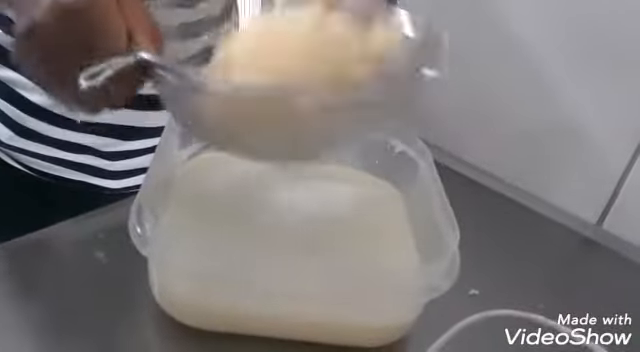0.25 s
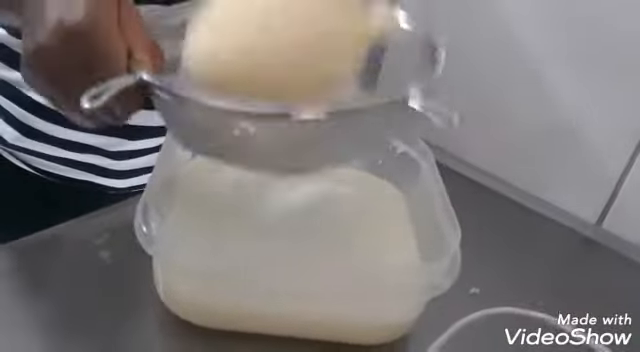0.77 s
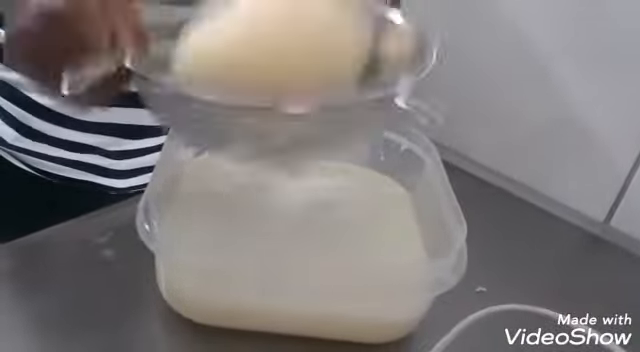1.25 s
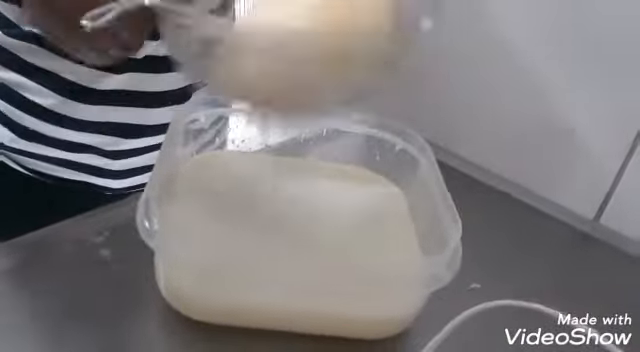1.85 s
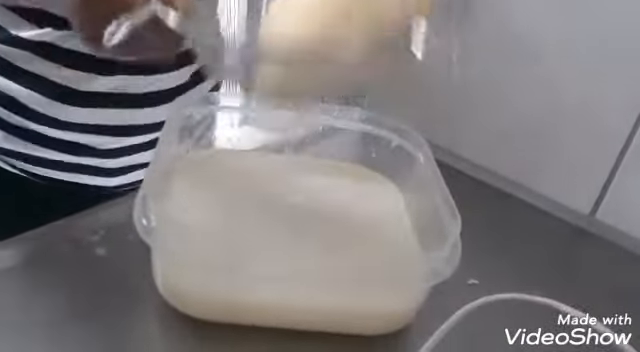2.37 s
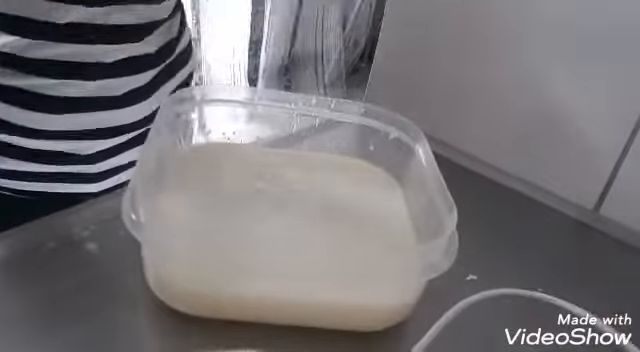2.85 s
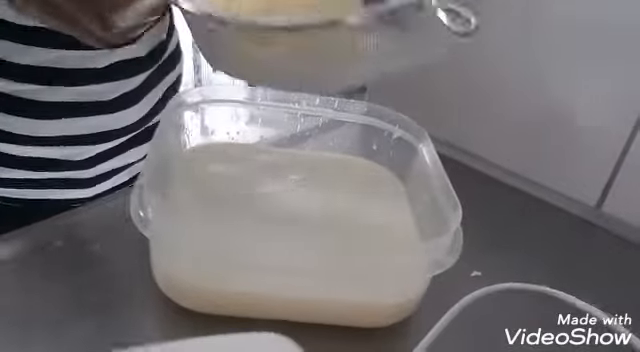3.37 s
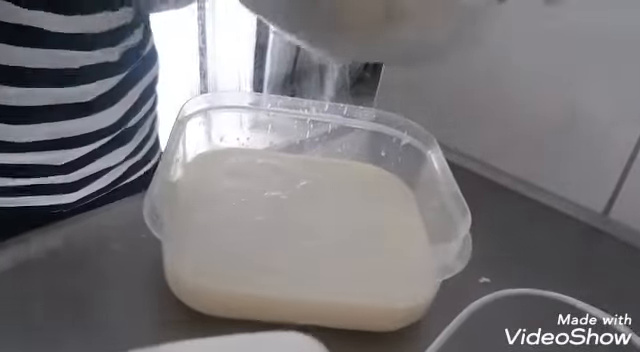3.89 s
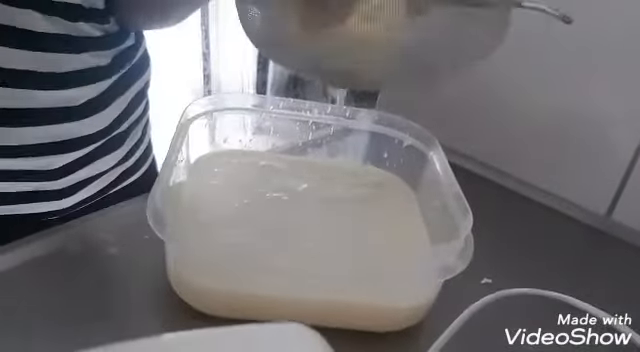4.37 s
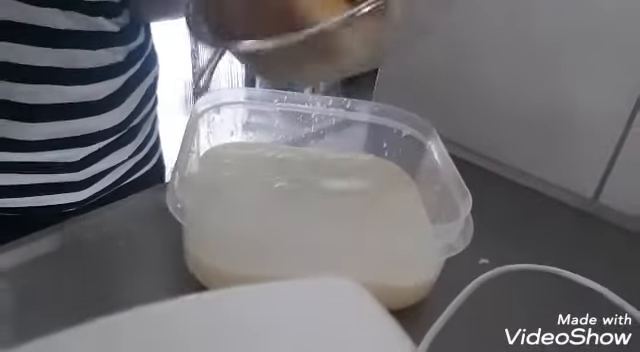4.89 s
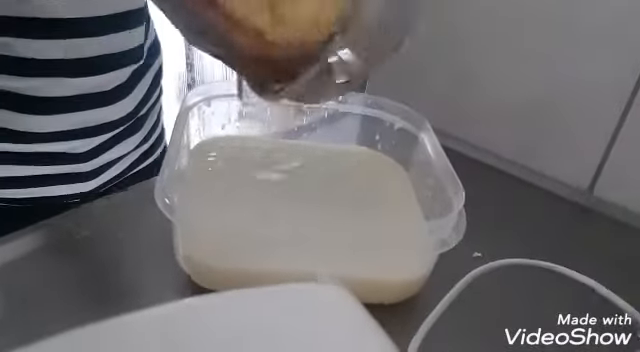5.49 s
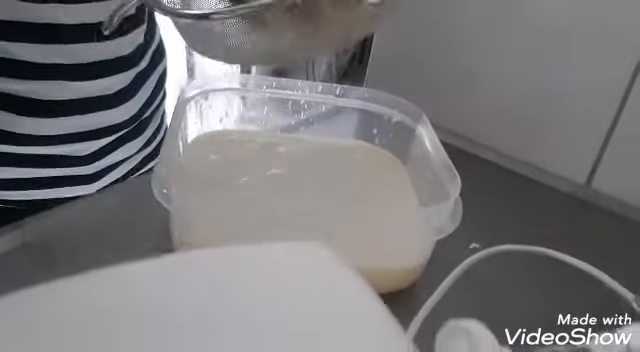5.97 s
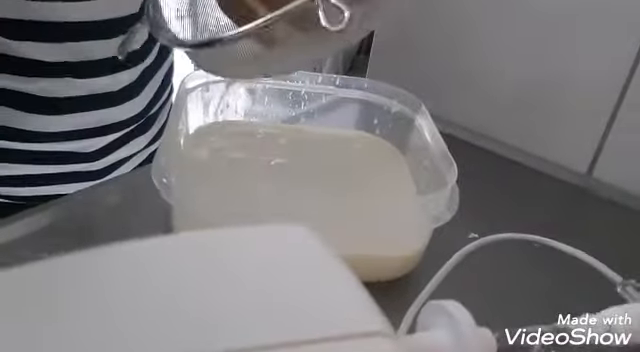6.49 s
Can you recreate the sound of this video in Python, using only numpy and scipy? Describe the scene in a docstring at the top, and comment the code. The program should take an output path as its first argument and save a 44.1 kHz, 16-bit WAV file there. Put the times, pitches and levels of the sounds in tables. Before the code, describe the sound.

A small tiled kitchen, heard close in stereo with a short, lively room ring and very quiet air. From 0 to 2 seconds, a wet butter lump is tossed and rolled in a wire sieve: short gritty swishes, soft low thuds, wet splats, and light knocks near 0.3, 0.85 and 1.1. Around 1.4-1.85 a squelchy gush gurgles into the plastic tub, rising in pitch over low glugs. It calms after 2; a firmer knock lands at 2.7, then clustered plinks and a bright metal click at 2.9. At 3.25 one hard, sharp knock cracks, clatters and rings briefly, easily the loudest event. From 3.5 tiny high clicks and drops resume, with dull sieve bumps near 4. From 4.4 to 5 drops patter busily, with a ringing tick on the tub at 4.63. Sparse bubbly plinks and trickles follow, thickening again from 6.2 to the end.

```python
"""Wet butter swishes over a mesh with soft thuds, liquid splats and plinks below, and hard knocks ring the room.
The lump is rolled about in a wire sieve over a plastic tub in a small tiled kitchen, close to a phone's two
microphones. Shaped noise makes the swish, thuds, splats and air; pitched decaying tones make the bubbles, a
bright metal click and a tick on the tub. The knocks are noise bursts with ringing modes: a few light ones,
then a sharp one. Decaying noise echoes the sieve, splats, knocks and plinks around the room."""
import sys
import numpy as np
from scipy import signal
from scipy.fft import rfft, irfft, next_fast_len
from scipy.io import wavfile

SR = 44100
rng = np.random.default_rng(int(sys.argv[2]) if len(sys.argv) > 2 else 0)


def waveform_to_disk(signal):
    """Save audio, clipped to [-1, 1], as 16-bit WAV at the path in sys.argv[1]."""
    frames = np.transpose(np.atleast_2d(signal))
    scaled = np.clip(frames, -1, 1) * 32767
    samples = np.round(scaled).astype(np.int16)
    wavfile.write(sys.argv[1], SR, samples)


N = 297189
TIME = np.arange(N) / SR
AIR_DB = -72
LOW_HZ, TOP_HZ = 36, 15300  # limits of the phone's microphones
DRAIN_START_S = 2.2  # fine droplets and faint stray drops fall only after this

# Levels in the tables are relative; each source's own settings set the final balance.
# quiet air of the kitchen: (frequency [Hz], density [dB per Hz])
AIR_SPECTRUM = [(20, -27), (50, 8.5), (110, -10), (200, -9.5), (400, -29), (800, -31), (1400, -21),
                (1700, -15), (1950, -4), (2250, -15), (2600, -15.5), (3300, -6.5), (4500, -9.5),
                (8000, -25), (15000, -36)]
# kitchen reverberation: (frequency [Hz], t60 [s])
ROOM_T60 = [(125, 0.59), (700, 0.57), (2500, 0.48), (6000, 0.32), (14000, 0.21)]
# how strongly the kitchen sends each frequency back: (frequency [Hz], level [dB])
ROOM_COLOUR = [(80, 2), (250, 0), (520, 2), (1200, 0.5), (2400, 1.5), (4400, 0.5), (6600, -3.5), (9000, 0),
               (14000, 0)]
# dull rumble and thud of the held sieve: (frequency [Hz], density [dB per Hz])
THUD_SPECTRUM = [(20, -45), (35, -11), (55, -4), (100, -1), (128, 2.5), (155, -10.5), (190, -2), (240, -13),
                 (340, -10.5), (550, -33), (1000, -40.5)]
# the lump slumps and the sieve sways in the hand: (time [s], level [dB], half length [s])
SWAYS = [(0.4, -55, 0.032), (0.6, -62, 0.06), (1.09, -56.5, 0.011), (1.53, -55.5, 0.032),
         (2.93, -56, 0.072), (3.47, -60.5, 0.06), (3.84, -63.5, 0.044), (4.02, -60, 0.026),
         (4.27, -62.5, 0.041), (4.62, -63.5, 0.039), (4.9, -56, 0.036), (5.2, -61, 0.19),
         (5.52, -63.5, 0.049), (5.81, -64.5, 0.042), (6.28, -59.5, 0.044), (6.43, -56, 0.031),
         (6.63, -58, 0.072)]
# the loaded sieve bobs on its springy handle: (time [s], pitch [Hz], peak [dB], half length [s])
BOBS = [(0.418, 130, -62, 0.031), (1.09, 165, -58, 0.014), (1.392, 190, -60, 0.031),
        (1.508, 125, -53, 0.0087), (1.605, 190, -62.5, 0.028), (2.862, 142, -55, 0.03),
        (2.962, 134, -56.5, 0.037)]
# the lump slumps against the mesh: (time [s], level [dB], middle frequency [Hz], decay [s])
BUMPS = [(0.4, -52.5, 302, 0.013), (1.357, -53, 420, .035), (1.48, -57, 420, .04), (1.812, -55, 200, .025),
         (3.956, -51.5, 237, 0.015), (4.014, -52, 253, 0.016), (4.187, -60, 307, 0.024),
         (4.224, -56, 200, 0.05), (4.255, -55, 232, 0.027), (4.555, -59, 283, .025),
         (4.84, -55.5, 380, .025), (6.406, -61, 298, .025), (6.655, -54.5, 380, .02)]
# resonances of the hollow tub: (frequency [Hz], width [Hz], level [dB])
TUB_MODES = [(385.5, 22, 4.5), (583, 14.5, -3.5), (800, 67, -11), (1504, 35, -1), (1697, 11, -3.5),
             (2070, 250, -0.5), (2320, 220, -12)]
# runs that break up into small drops: (time [s], length [s], level [dB], middle bubble pitch [Hz])
DRIBBLES = [(4.5, 0.13, -58, 2080), (4.834, 0.067, -59.5, 1300), (4.9, 0.11, -61.5, 1430),
            (5.235, .11, -69.5, 1310), (5.459, 0.1, -61, 1810), (6.21, .14, -59, 2380),
            (6.402, 0.055, -59.5, 1910), (6.54, 0.11, -56.5, 2520)]
# surface churned by a dribble: (frequency [Hz], density [dB per Hz])
CHURN_SPECTRUM = [(150, 15.5), (600, -7.5), (900, 1.5), (1300, 3), (2200, -3.5), (3500, -6), (8000, -12)]
# a gush from the tilted sieve, its bubbles getting finer: (time [s], level [dB], bubble pitch [Hz])
GUSH = [(1.4, -84, 1300), (1.499, -62, 1590), (1.61, -58, 1790), (1.68, -57.5, 2310), (1.76, -63, 2660),
        (1.851, -77, 2920)]
# drops that slap the liquid or the tub; the steepest tilts are tiny high bubbles:
# (time [s], level [dB], tilt [dB per octave])
SPLATS = [(0.288, -39, -3), (0.325, -40, -3), (0.461, -42.5, 1.5), (1.2325, -39, 1.5), (1.48, -41, 4),
          (1.862, -38, 0.5), (1.962, -46, 3), (1.9901, -42, 1), (2.4761, -53.5, 1), (2.762, -46, -4),
          (2.792, -39.5, -2), (2.807, -42, -5.5), (2.91, -53.5, -11), (2.956, -44.5, 12.5),
          (3.04, -45, 0.5), (3.1194, -45.5, -0.5), (3.161, -48, -0.5), (3.523, -51, -5), (3.6697, -43.5, 9),
          (3.7485, -44.5, -5), (3.847, -45, 25), (4.007, -51, -8), (4.382, -37.5, -3.5), (4.423, -41.5, -4),
          (4.5564, -39, 10), (4.56, -44.5, -6), (4.6341, -41.5, -3), (4.663, -41, 26), (4.729, -42, 18),
          (4.8344, -45, -8), (4.855, -47, 1), (4.975, -40, 14), (5.3642, -42.5, 2), (5.725, -48, 10),
          (5.8555, -46.5, 4), (6.407, -42, -3), (6.5398, -36.5, -2.5), (6.6155, -46, -6), (6.654, -47, -12),
          (6.7065, -51.5, -3)]
# slap and spray of a drop: (frequency [Hz], density [dB per Hz])
SPLASH_SPECTRUM = [(200, -3), (800, -7), (2000, 0), (4200, 6.5), (7000, 10), (10000, 7.5), (12500, 7.5),
                   (15500, -12)]
# plinking drops that trap a bubble, a bright metal click at 2.91 s and a ringing tick on the plastic tub
# at 4.63 s: (time [s], pitch [Hz], peak [dB], left minus right [dB], t60 [s])
PLINKS = [(0.066, 2280, -55, -1, 0.059), (0.29, 900, -47.5, -7, 0.034), (0.402, 1365, -39.5, 7, 0.013),
          (0.67, 2030, -53, -3, 0.01), (0.7787, 2475, -43.5, -2, 0.023), (1.054, 1560, -46.5, -1, 0.011),
          (1.598, 1470, -43.5, 6, 0.016), (1.636, 1650, -45, -5, 0.016), (2.313, 1590, -47.5, 1, 0.015),
          (2.4781, 2900, -40, -1, 0.013), (2.4965, 1610, -51, 2, 0.021), (2.7905, 5260, -44, 0, 0.016),
          (2.792, 830, -43.5, 0, 0.055), (2.7945, 1846, -37, -4, 0.024), (2.801, 1934, -36.5, 5, 0.016),
          (2.829, 3360, -52, 2, .015), (2.8625, 3560, -49, 5, 0.019), (2.866, 4100, -51, 5, .016),
          (2.882, 3670, -55, 6, 0.018), (2.909, 6800, -36, -3, 0.012), (2.9095, 1974, -44, 5, 0.032),
          (2.9105, 8060, -42.5, 1, .014), (2.913, 2560, -54, 2, .018), (2.948, 2620, -42.5, 13, 0.029),
          (2.9495, 3220, -45, 14, .014), (2.956, 3273, -41.5, -3, 0.024), (2.957, 2750, -45.5, 13, 0.008),
          (3.23, 2330, -56, 0, 0.0063), (3.602, 8670, -41, -3, 0.022), (3.6125, 4180, -45.5, 3, 0.017),
          (3.659, 4230, -47, 2, 0.012), (3.671, 7160, -44.5, 5, .012), (3.7068, 12100, -38, 4, 0.016),
          (3.7747, 3860, -45.5, 2, 0.015), (3.7979, 11950, -39, 8.5, 0.0084), (4.307, 2460, -49, -3, 0.012),
          (4.4969, 2030, -41.5, -3, 0.014), (4.5052, 3920, -43, 14, .014), (4.526, 1950, -37, 6, 0.0077),
          (4.53, 2950, -43, 4, 0.0092), (4.562, 1100, -53.5, 0, .014), (4.59, 976, -52.5, -9, .02),
          (4.594, 2130, -50.5, -7, .02), (4.6343, 4030, -32, 31, 0.01), (4.6348, 4885, -35, 3, 0.016),
          (4.639, 5360, -46, 9, 0.016), (4.649, 2350, -47, 4, .012), (4.6817, 8770, -43, 16, 0.012),
          (4.745, 3670, -46.5, 18, 0.019), (4.84, 883, -39, -5, 0.038), (4.8601, 833, -43.5, 1, 0.033),
          (4.897, 803, -52, -3, .03), (4.921, 720, -55, -11, 0.022), (4.898, 2180, -54, 5, .015),
          (4.946, 1340, -53, 8, 0.017), (4.956, 1600, -64, 3, 0.017), (4.985, 2000, -56, 5, 0.0097),
          (5.209, 2780, -41, 12, 0.011), (5.236, 1102, -53.5, -1, 0.046), (5.255, 2070, -59, 6, 0.012),
          (5.27, 1000, -57, -3, .025), (5.3002, 1025, -51.5, -4, 0.042), (5.302, 2270, -59, 0, 0.01),
          (5.3638, 5380, -40, -1, 0.012), (5.391, 2510, -40, 5, 0.0067), (5.401, 2170, -43, 3, 0.01),
          (5.4618, 1320, -46, 6, .02), (5.5, 2050, -56, -1, .015), (5.536, 2880, -47.5, 18, .015),
          (5.558, 2257, -37.5, 2, 0.035), (5.559, 1443, -41, 7, 0.02), (5.725, 2038, -37, 2, 0.025),
          (5.841, 2080, -52.5, 4, .018), (6.2112, 1340, -39, 3, 0.013), (6.226, 1350, -43, 0, .018),
          (6.2432, 2164, -34.5, 7, 0.016), (6.268, 1990, -48, 4, .018), (6.297, 2160, -43, 4, 0.024),
          (6.332, 3003, -41, 13, 0.021), (6.411, 2220, -48, -2, .014), (6.464, 3050, -46, 9, 0.022),
          (6.5428, 3040, -43, 9, 0.024), (6.556, 3250, -53, 9, .016), (6.577, 2280, -50.5, 9, 0.021),
          (6.618, 4150, -48, 9, .01), (6.655, 1020, -40.5, -9, 0.01)]
# plop and wash around a plink's own pitch: (multiple of the pitch, density [dB per Hz])
PLOP_SPECTRUM = [(.5, -20), (.9, -5), (1.12, 0), (1.5, -10), (3, -26), (8, -38)]
WASH_SPECTRUM = [(.33, -24), (.88, -11), (1, 0), (1.2, -8), (3, -26)]
# hard knocks: (time [s], level [dB], extra level of thump and low modes [dB], left minus right [dB])
KNOCKS = [(0.2865, -32.5, 3, -6), (0.8545, -32, 5.5, -4), (1.1221, -33.5, -2, 3), (2.7299, -19, 0, 6.5),
          (2.7935, -36.5, 12, 2.5), (3.2463, -1.5, -3, 7)]
# ring of the knocked thing: (frequency [Hz], level [dB], t60 [s])
KNOCK_MODES = [(79, -7, 0.1), (155, -7, 0.21), (298.4, -2, 0.1), (547, -0.5, 0.047), (594, -2.5, 0.11),
               (825, 3, 0.086), (1386, 0, 0.045), (1910, -9.5, 0.11), (2160, -7, .08), (2396, -2, 0.1),
               (2675, 11, 0.029), (3300, -13, .08), (3780, 7.5, 0.027), (4114, 12, 0.028),
               (4490, 13, 0.023), (5040, 7, 0.024), (5860, 3, 0.0091), (6220, 11, .014),
               (6710, 12.5, 0.012), (7560, 6.5, 0.012), (8930, 0.5, .025), (11250, 2, 0.0243),
               (11740, -3, 0.016)]
# noise parts of a knock: (frequency [Hz], density [dB per Hz])
CRACK_SPECTRUM = [(200, -5), (700, -7.5), (1100, -15.5), (2500, 0), (4200, -8), (5400, -21), (6600, 6),
                  (8300, -7.5), (11500, -4), (15000, -20)]
CLATTER_SPECTRUM = [(150, 3), (550, 2), (1100, -1.5), (1500, 5), (2400, 8.5), (3200, -1), (4300, -24),
                    (5400, -10), (6700, -2.5), (8500, 1.5), (12000, -1), (15000, -17)]
THUMP_SPECTRUM = [(30, -6), (70, 7.5), (130, 0), (200, -11.5), (300, -7), (410, -9), (520, 3.5), (690, -15),
                  (820, 0.5), (1050, -20), (4000, -46.5)]
# how briskly the butter slides on the mesh: (time [s], hiss [dB], wet squelch [dB])
SLIDE = [(0.1, -69, -79), (0.5, -67, -76), (0.8, -67, -107), (1.28, -65.5, -70), (1.45, -60, -70),
         (1.62, -60.5, -60), (1.76, -57.5, -79), (2.02, -70, -78), (2.16, -76.5, -76), (2.45, -74.5, -77.5),
         (2.8, -69, -100), (3.2, -66.5, -95), (3.45, -73.5, -74.5), (3.78, -73.5, -72),
         (4.12, -81.5, -78.5), (4.54, -67, -76.5), (5.12, -75.5, -76.5), (5.45, -69, -85.5),
         (5.9, -71, -70.5), (6.04, -82, -81.5), (6.3, -72, -81), (6.74, -71, -75)]
# the lump is tossed or slips and lands on the mesh: (time [s], peak [dB], half length [s])
SWISHES = [(0.0, -48.5, 0.013), (0.297, -44, 0.0074), (0.167, -60, 0.0075), (0.225, -59.5, 0.018),
           (0.514, -54.5, 0.018), (0.587, -49, 0.014), (0.768, -55.5, 0.014), (0.865, -40.5, 0.006),
           (1.036, -56.5, 0.02), (1.127, -39, 0.0076), (1.285, -56.5, 0.015), (1.37, -44, 0.0093),
           (1.5, -51.5, 0.033), (1.604, -48.5, 0.019), (1.843, -42.5, 0.0082), (2.055, -52, 0.018),
           (2.274, -62.5, 0.026), (2.612, -60, 0.047), (2.755, -55, 0.0065), (3.214, -57, 0.0036),
           (4.259, -65, 0.036), (5.306, -58, 0.012), (5.79, -61, 0.03), (6.157, -55.5, 0.0089),
           (6.282, -52.5, 0.0059)]
# butter on the wires, and the liquid pressed out: (frequency [Hz], density [dB per Hz])
MESH_SPECTRUM = [(300, -22.5), (800, -9), (1100, -10), (2500, -9.5), (4200, 0), (5300, -1), (6800, 3.5),
                 (9500, -2.5), (12500, 1), (15500, -13.5)]
SQUELCH_SPECTRUM = [(200, 5), (400, 3.5), (600, 10.5), (800, -13), (1050, 4), (1500, 4), (2100, 2.5),
                    (3500, 1.5), (6000, -33.5)]


def undb(db):
    """Amplitude gain for a level in dB."""
    return 10 ** (np.asarray(db) / 20)


def unit(x):
    """Scale to rms 1."""
    return x / np.sqrt(np.mean(x ** 2))


def curve(rows, axis):
    """One column of a time table at every sample."""
    rows = np.array(rows)
    return np.interp(TIME, rows[:, 0], rows[:, axis])


def at_pitch(points, hz):
    """Read (Hz, value) points on a log-frequency axis."""
    f, value = np.transpose(points)
    return np.interp(np.log(hz + 1), np.log(f), value)


def noise(spectrum, size, tilt_db=0):
    """Coloured stereo noise of rms 1; long waves reach both microphones nearly alike."""
    n = next_fast_len(size)
    hz = np.fft.rfftfreq(n, 1 / SR)
    mid, side = rfft(rng.standard_normal((2, n)))
    alike = 0.88 / (1 + (hz / 380) ** 2)
    opposite = np.array([[1], [-1]])
    pair = mid * np.sqrt(1 + alike) + opposite * side * np.sqrt(1 - alike)
    colour_db = at_pitch(spectrum, hz) + tilt_db * np.log2(np.maximum(hz, 800) / 4000)
    return unit(irfft(pair * undb(colour_db), n)[:, :size])


def walk(rate):
    """Random wander of rms 1, with straight lines between `rate` knots a second."""
    knots = rng.standard_normal(int(N / SR * rate) + 2)
    return unit(np.interp(TIME * rate, np.arange(len(knots)), knots))


def pan(db):
    """Left and right gains for a level difference (positive is left)."""
    return unit(undb(np.array([[db], [-db]]) / 2))


def add(out, s, sound):
    """Mix a sound in at time s."""
    i = max(int(s * SR), 0)
    out[:, i:i + sound.shape[1]] += sound[:, :max(N - i, 0)]


def swells(rows, sharpness=1.11):
    """Power over time of movements that swell and die away, from rows (s, peak dB, half length s)."""
    power = np.zeros(N)
    for s, db, length in rows:
        near = slice(*np.searchsorted(TIME, [s - 10 * length, s + 10 * length]))
        power[near] += undb(db) ** 2 * np.exp(-np.abs((TIME[near] - s) / length) ** sharpness)
    return power


def bubble(hz, t60, rise=0.0016, glide=0.99, size=2048):
    """A trapped bubble rings unevenly, its pitch climbing slightly; the microphones catch it out of step."""
    t = np.arange(size) / SR
    swell = (1 - np.exp(-t / rise)) ** 2 * np.exp(-np.log(1000) * t / t60)
    wobble = 0.3 * np.cumsum(rng.standard_normal(size)) * np.sqrt(hz / SR)
    phase = 2 * np.pi * hz * (t + glide * (t ** 2 / 2 - t * t60 / 6)) + wobble
    lag = rng.uniform(1.29, 2.26) * np.sign(rng.standard_normal()) * min(hz / 1200, 1)  # radians
    return swell / swell.max() * np.sin(phase + np.array([[0], [lag]]))


def drain_times(count):
    """Random moments for small drops after DRAIN_START_S: the stronger the sliding hiss, the more of them."""
    drained = np.cumsum(undb(curve(SLIDE, axis=1)) * (TIME > DRAIN_START_S))
    return np.interp(rng.random(count), drained / drained[-1], TIME)


def air(waver_db=4.2):
    """The quiet air of the kitchen is coloured noise of wavering level."""
    return undb(AIR_DB + waver_db * walk(7)) * noise(AIR_SPECTRUM, size=N)


def echoes(tail_db, early_db=-10, early_decay=0.0096):
    """Noise fading fast for echoes off tub, worktop and tiles, and band by band for the diffuse ring."""
    t = np.arange(32768) / SR
    hz = np.fft.rfftfreq(len(t), 1 / SR)
    edges = [0, 250, 500, 1000, 2000, 4000, 8000, 12000, SR]  # Hz
    white = rfft(noise(ROOM_COLOUR, size=len(t)))
    tail = 0
    for lo, hi in zip(edges, edges[1:]):
        t60 = at_pitch(ROOM_T60, (lo + hi) / 2)
        band = irfft(white * ((hz >= lo) & (hz < hi)))
        tail = tail + band * np.exp(-np.log(1000) * t / t60)
    tail = tail * np.clip(t / 0.0013 - 0.5, 0, 1)
    early = noise(ROOM_COLOUR, size=len(t)) * np.exp(-t / early_decay) * (t > 0.003)
    return (undb(early_db) * unit(early) + undb(tail_db) * unit(tail)) / np.sqrt(len(t))


def kitchen(dry, tail_db):
    """Sound from either side comes back from the room to both microphones."""
    wet = sum(signal.fftconvolve(side[None], echoes(tail_db), axes=1)[:, :N] for side in dry)
    return dry + wet / np.sqrt(2)


def handling(landing_db=-14, landing_s=0.014, lag_s=0.0082, hold_db=-71, flutter_db=2.0):
    """The hand-held sieve rumbles faintly, thuds just after each landing and again when it sways."""
    landings = swells([(s + lag_s, db + landing_db, landing_s) for s, db, _ in SWISHES])
    weight = np.sqrt(landings + swells(SWAYS) + undb(hold_db) ** 2)
    return noise(THUD_SPECTRUM, size=N) * weight * undb(flutter_db * walk(30)) * pan(5.5)


def bobbing(level_db=0, side_db=3):
    """Each bob of the sieve on its springy handle swells and dies away as one low tone."""
    hum = np.zeros(N)
    for s, hz, db, length in BOBS:
        swell = np.sqrt(2 * swells([(s, db, length)]))
        hum += swell * np.sin(2 * np.pi * (hz * TIME + rng.random()))
    return undb(level_db) * pan(side_db) * hum


def bumps(level_db=0, rise=0.0063):
    """Each bump is a short, dull noise burst of the loaded sieve around its middle frequency."""
    out, t = np.zeros((2, N)), np.arange(8192) / SR
    for s, db, hz, decay in BUMPS:
        spectrum = [(hz / 3, -14), (hz, 0), (hz * 1.18, -4), (hz * 2, -22), (hz * 8, -40), (hz * 20, -65)]
        shape = (1 - np.exp(-t / rise)) * np.exp(-t / decay)
        add(out, s, undb(db + level_db) * pan(2.2) * noise(spectrum, size=len(t)) * shape)
    return out


def trickle(level_db=-62, spread_db=2.0, centre_hz=3600, t60=0.006, count=170):
    """Fine droplets, each a tiny bubble, tick down between the larger ones as the lump drains."""
    out = np.zeros((2, N))
    for when, (pitch, size, side) in zip(drain_times(count), rng.standard_normal((count, 3))):
        hz = np.clip(centre_hz * 2 ** (0.9 * pitch), 800, 13000)
        gain = undb(level_db + spread_db * size) * pan(3 + 4 * side)
        add(out, when, gain * bubble(hz, t60, size=512))
    return out


def dribbles(level_db=-4, octaves=0.655, spread_db=4.0, churn_db=-6, t60=0.009, count=26):
    """A thin run of liquid churns the surface as noise and patters down as small overlapping bubbles."""
    runs = [(s + length / 2, db + churn_db, length / 2) for s, length, db, _ in DRIBBLES]
    out = noise(CHURN_SPECTRUM, size=N) * np.sqrt(swells(runs, sharpness=3.5))
    for s, length, db, centre_hz in DRIBBLES:
        for when, (pitch, size, side) in zip(rng.random(count), rng.standard_normal((count, 3))):
            hz = np.clip(centre_hz * 2 ** (octaves * pitch), 600, 9000)
            gain = undb(db + level_db + spread_db * size) * pan(2 + 3 * side)
            add(out, s + length * when, gain * bubble(hz, t60, size=512))
    return out


def gush(level_db=2.0, octaves=0.355, spread_db=-0.5, t60=0.014,
         glug_db=-58, glug_hz=680, glug_s=1.54, glug_spread_s=0.085, count=170):
    """A short run of liquid gurgles up in pitch into the tub and drags down large, low bubbles."""
    out = np.zeros((2, N))
    times, levels, pitches = np.transpose(GUSH)
    moments = np.linspace(times[0], times[-1], count)
    for s, (pitch, size, side) in zip(moments, rng.standard_normal((count, 3))):
        hz = np.interp(s, times, pitches) * 2 ** (octaves * pitch)
        db = np.interp(s, times, levels) + level_db + spread_db * size
        add(out, s + rng.uniform(0, 0.005), undb(db) * pan(3 * side) * bubble(hz, t60))
    for when, pitch, side in rng.standard_normal((count // 2, 3)):
        glug = bubble(glug_hz * 2 ** (0.7 * pitch), t60)
        add(out, glug_s + glug_spread_s * when, undb(glug_db) * pan(3 * side) * glug)
    return out


def small_splats(impact_db=-14, impact_tilt_db=-3, level_db=-53, count=24):
    """Rows like SPLATS for the light slap that starts each plink, click or tick and for faint stray drops."""
    impacts = [(s, db + impact_db, impact_tilt_db) for s, _, db, _, _ in PLINKS]
    draws = zip(drain_times(count), rng.random((count, 2)))
    strays = [(s, level_db - 10 * size, 10 * (tilt - 0.5)) for s, (size, tilt) in draws]
    return impacts + strays


def splats(level_db=-0.5, decay=0.0028, spray_db=-15, spray_decay=0.024, side_db=0.5):
    """Slaps, sprays and, at the steepest tilts, tiny high bubbles: noise bursts of a few milliseconds."""
    out, t = np.zeros((2, N)), np.arange(2048) / SR
    fall = np.exp(-t / decay) + undb(spray_db) * np.exp(-t / spray_decay)
    shape = (1 - np.exp(-t / 0.00086)) * fall
    for s, db, tilt_db in SPLATS + small_splats():
        burst = shape * noise(SPLASH_SPECTRUM, size=len(t), tilt_db=tilt_db)
        add(out, s, undb(db + level_db) * pan(side_db) * burst)
    return out


def plinks(level_db=-1, plop_db=-9, plop_decay=0.0026, wash_db=-13, wash_decay=0.013,
           satellite_db=-13, scatter_s=0.04, count=9):
    """A drop plops, plinks, stirs a short wash and throws off droplets; the click and tick are built alike."""
    out, t = np.zeros((2, N)), np.arange(4096) / SR
    plop = undb(plop_db) * (1 - np.exp(-t / 0.0015)) * np.exp(-t / plop_decay)
    wash = undb(wash_db) * (1 - np.exp(-t / 0.004)) * np.exp(-t / wash_decay)
    for s, hz, db, side_db, life in PLINKS:
        add(out, s, undb(db + level_db) * pan(side_db) * bubble(hz, life))
        for spectrum, shape in ((PLOP_SPECTRUM, plop), (WASH_SPECTRUM, wash)):
            around_pitch = np.array(spectrum) * [hz, 1]
            add(out, s, undb(db) * pan(side_db / 2) * shape * noise(around_pitch, size=len(t)))
        for delay, pitch, size in rng.random((count, 3)):
            droplet = bubble(min(hz * 2 ** (1.3 * pitch - 0.4), 14000), life / 3, size=1024)
            gain = undb(db + satellite_db - 10 * size - 6.7 * delay)  # later droplets are weaker
            add(out, s + 0.002 + scatter_s * delay, gain * droplet)
    return out


def knock_ring(t, weight_db, side_db, build_cycles=3, build_s=0.0042, chatter=0.38):
    """The knocked thing rings in decaying modes; the low ones build up last."""
    ring = 0
    for hz, mode_db, t60 in KNOCK_MODES:
        apart = min(hz / 2500, 1)  # short waves differ most between the microphones
        phase = rng.uniform(0, 2 * np.pi) + np.array([[0], [1.42 * apart]])
        build = (1 - np.exp(-t / min(build_cycles / hz, build_s))) ** 2
        fade = build * np.exp(-np.log(1000) * t / t60)
        gain = undb(mode_db + weight_db * (hz < 1000)) * pan(side_db * apart ** 2)
        # loose contact jolts the ring
        jolts = chatter * np.cumsum(rng.standard_normal(len(t))) * np.sqrt(min(hz, 3000) / SR)
        ring = ring + gain * fade * np.sin(2 * np.pi * hz * t + phase + jolts)
    return ring


def knocks(crack_db=-16.0, crack_decay=0.0024, bounce_db=-6, bounce_s=0.0044,
           clatter_db=-29.5, clatter_rise=0.00395, clatter_decay=0.022,
           ring_db=-27, thump_db=-27, thump_s=0.0052):
    """A hard noise crack rebounds within milliseconds, with a brief clatter, a hollow thump and a short ring."""
    out, t = np.zeros((2, N)), np.arange(16384) / SR
    attack = 1 - np.exp(-t / 0.0006)
    rebound = undb(bounce_db) * (t > bounce_s) * np.exp(-np.abs(t - bounce_s) / crack_decay)
    snap = attack * (np.exp(-t / crack_decay) + rebound)
    rattle = (1 - np.exp(-t / clatter_rise)) * np.exp(-t / clatter_decay)
    heave = t / thump_s * np.exp(1 - t / thump_s)
    for s, db, weight_db, side_db in KNOCKS:
        crack = undb(crack_db) * pan(side_db) * noise(CRACK_SPECTRUM, size=len(t)) * snap
        clatter = undb(clatter_db) * noise(CLATTER_SPECTRUM, size=len(t)) * rattle
        thump = undb(thump_db + weight_db) * noise(THUMP_SPECTRUM, size=len(t)) * heave
        ring = undb(ring_db) * knock_ring(t, weight_db, side_db)
        add(out, s, undb(db) * (crack + clatter + thump + ring))
    return out


def crackle(spectrum, rate, spread_db):
    """Dense tiny clicks of very uneven size, rms 1."""
    draws = rng.random((int(rate * N / SR), 4))
    size = undb(-spread_db * np.log(np.maximum(draws[:, 1], 0.02)))
    clicks = np.zeros((2, N))
    clicks[:, (draws[:, 0] * N).astype(int)] = size * (draws[:, 2:].T - 0.5)
    grain = noise(spectrum, size=256) * np.exp(-np.arange(256) / SR / 0.00027)
    return unit(signal.fftconvolve(clicks, grain, axes=1)[:, :N])


def froth(centre_hz=1400, octaves=0.82, cycles=11, spread_db=2.5, count=1800):
    """A crowd of tiny short-lived bubbles, rms 1."""
    out = np.zeros((2, N))
    moments = rng.uniform(0, N / SR, count)
    for when, (pitch, size, side) in zip(moments, rng.standard_normal((count, 3))):
        hz = np.clip(centre_hz * 2 ** (octaves * pitch), 400, 9000)
        t60 = min(cycles / hz, 0.013)
        add(out, when, undb(spread_db * size) * pan(5 * side) * bubble(hz, t60, size=512))
    return unit(out)


def in_tub(x, ring_db=5):
    """Liquid sounds with the resonances of the hollow tub added, rms 1."""
    ring = 0
    for hz, width, db in TUB_MODES:
        ring = ring + undb(db) * signal.lfilter(*signal.iirpeak(hz, hz / width, fs=SR), x)
    return unit(x + undb(ring_db) * ring)


def sieve(grain_db=-5, swish_db=0, slide_db=1.0, squelch_db=-2, froth_db=-1,
          flicker_db=1.5, squeeze_db=-20, seep_db=3):
    """Wet butter drags over the wires, hissing at each toss; the liquid pressed out squelches and trickles."""
    tosses = undb(swish_db) ** 2 * swells(SWISHES)  # power
    drag = np.sqrt(tosses + undb(curve(SLIDE, axis=1) + slide_db) ** 2)
    grain = crackle(MESH_SPECTRUM, rate=640, spread_db=3.0)
    hiss = unit(noise(MESH_SPECTRUM, size=N) + undb(grain_db) * grain)
    flow = undb(curve(SLIDE, axis=2) + seep_db) + undb(squeeze_db) * np.sqrt(tosses)
    liquid = noise(SQUELCH_SPECTRUM, size=N) + undb(froth_db) * froth()
    wet = undb(squelch_db) * in_tub(liquid)
    return (drag * hiss + flow * wet) * undb(flicker_db * walk(110))


def scene():
    """Sieve, splats and knocks sound into the kitchen, over its air; the sounds in the tub stir the room less."""
    in_the_open = kitchen(sieve() + splats() + knocks(), tail_db=-10.0)
    at_the_tub = kitchen(gush() + plinks() + dribbles() + trickle(), tail_db=-13.0)
    return in_the_open + at_the_tub + handling() + bobbing() + bumps() + air()


def record(dry):
    """The phone's microphones drop the deepest bass and cut the top."""
    high_pass = signal.butter(3, LOW_HZ, "high", fs=SR, output="sos")
    low_pass = signal.ellip(8, 0.2, 70, TOP_HZ, fs=SR, output="sos")
    return signal.sosfilt(low_pass, signal.sosfilt(high_pass, dry))


dry = scene()
out = record(dry)
waveform_to_disk(out)
```